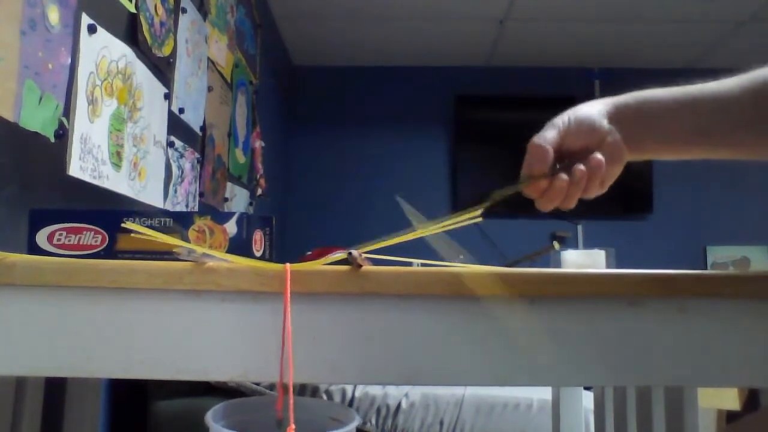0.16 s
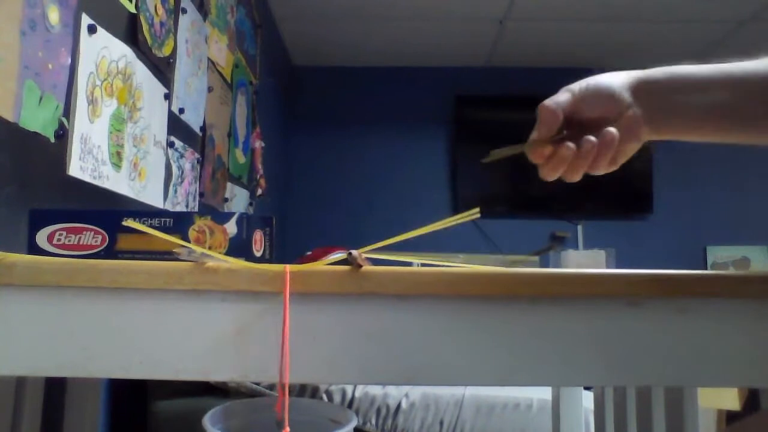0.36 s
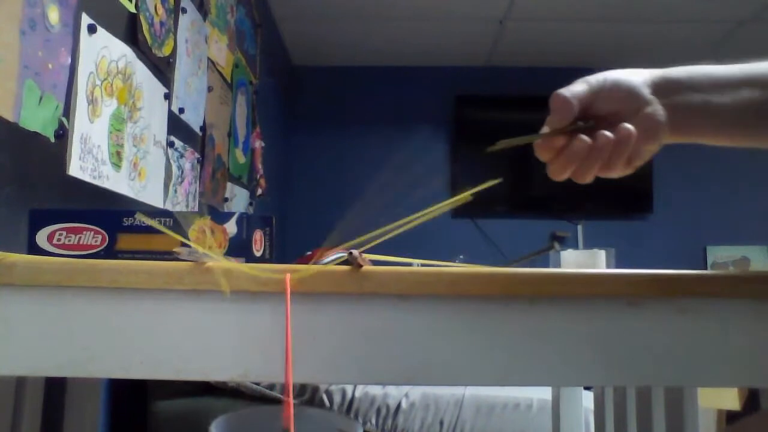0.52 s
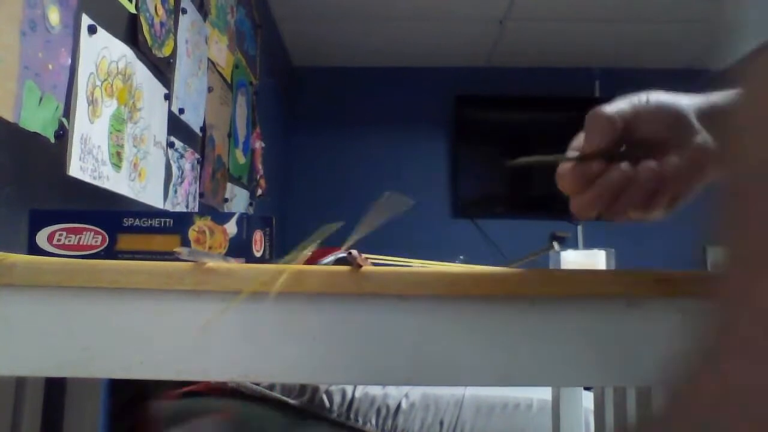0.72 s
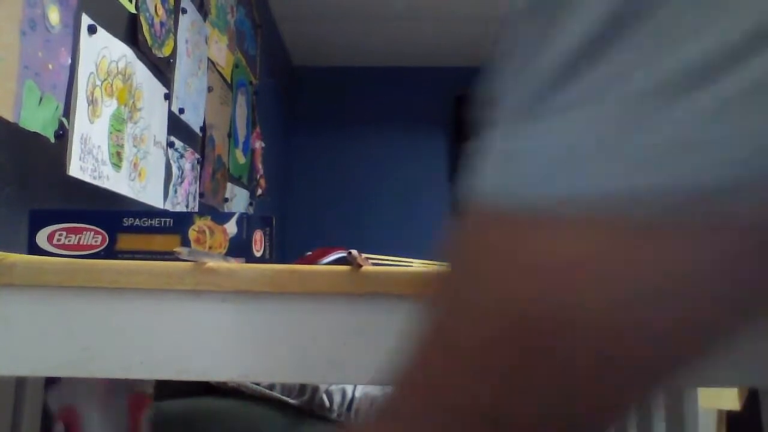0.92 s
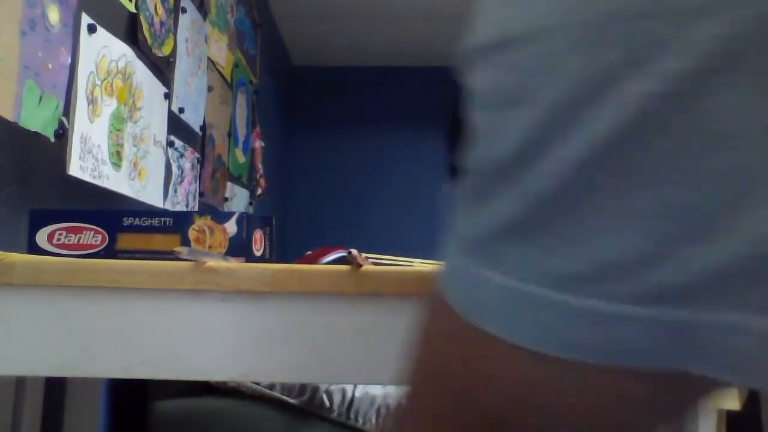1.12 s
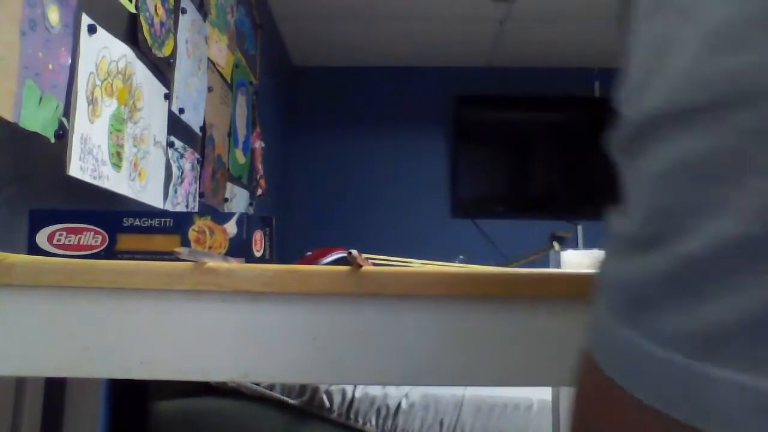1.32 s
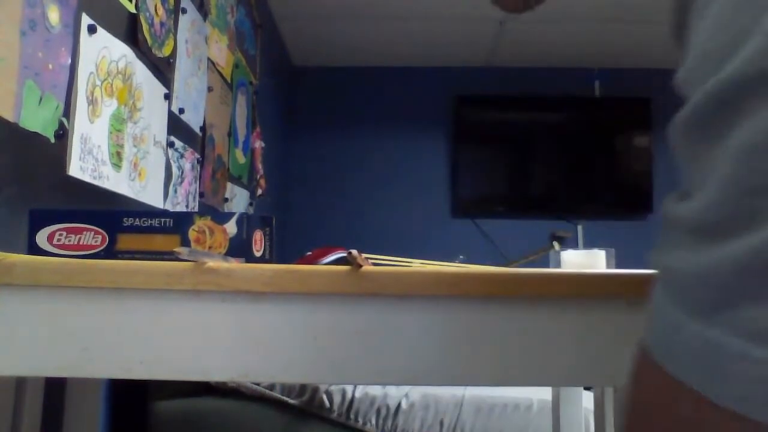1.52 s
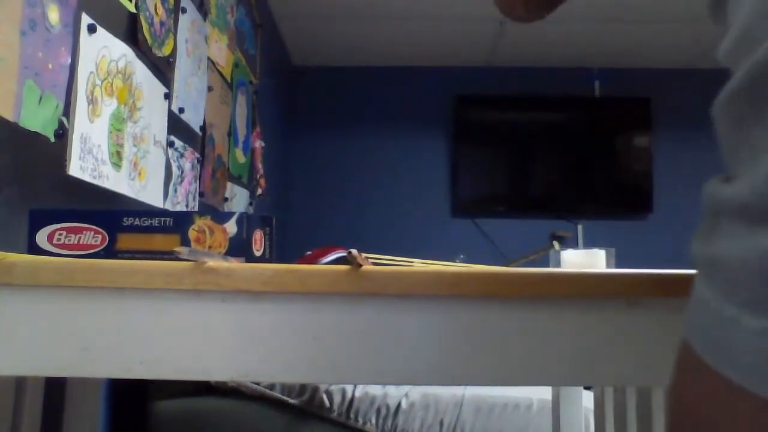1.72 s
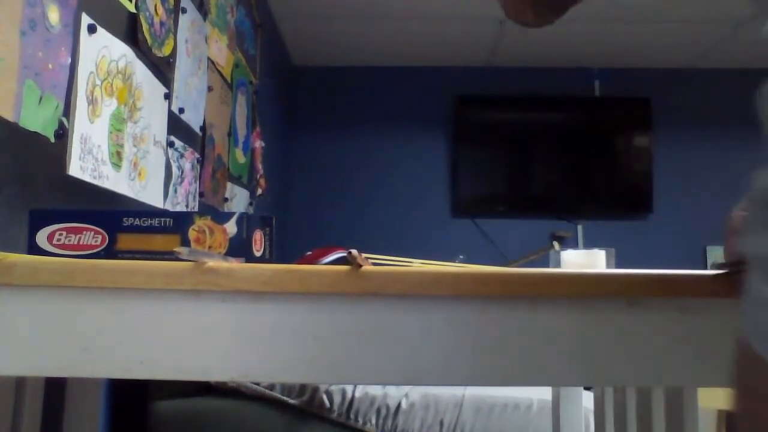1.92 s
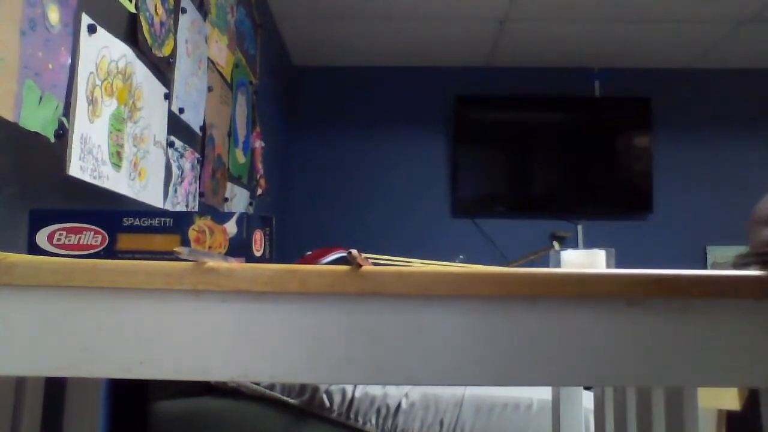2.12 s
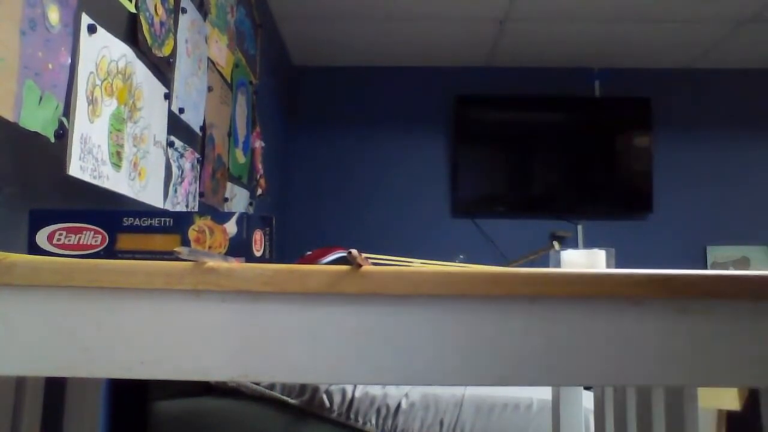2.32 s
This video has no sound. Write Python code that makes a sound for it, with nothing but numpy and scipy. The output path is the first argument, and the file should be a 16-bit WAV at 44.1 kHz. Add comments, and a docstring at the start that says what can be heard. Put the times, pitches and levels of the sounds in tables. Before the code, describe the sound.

Dry spaghetti ticks and snaps, a brief near-quiet gap follows, then a cup of nails slams down, bounces and spills with clatter and short metallic ringing, heard indoors from nearby with faint low rumble.

```python
"""Over a faint rumble come first ticks, then sharp cracks: a beam of dry pasta snaps under a hanging plastic cup
of steel nails. The cup then crashes on a hard floor; the nails spill, jostle and ring until all settles.
Cracks and knocks are shaped noise bursts with short pings and the tail of a small room; taps, cup and nails
are ringing modes; the jostling load is a dense train of clicks through resonators; thumps and rumble are
low noise."""
import sys
import numpy as np
from scipy import signal
from scipy.fft import rfft, irfft
from scipy.io import wavfile
from scipy.ndimage import uniform_filter1d, minimum_filter1d

SR = 44100
rng = np.random.default_rng(int(sys.argv[2]) if len(sys.argv) > 2 else 0)


def persist_wave(psi):
    """Save psi, clipped to +-1, as 16-bit WAV."""
    counts = np.round(np.clip(psi, -1, 1) * 32767).astype(np.int16)
    wavfile.write(sys.argv[1], SR, np.atleast_2d(counts).T)


N = 103723  # length [samples]

# Low rumble of the house: (time [s], level [dB])
HUM = [(0, -90), (.12, -61), (.38, -51), (1.3, -45.5), (1.5, -47), (2.2, -49.5), (2.35, -60)]
# Relative spectrum of the rumble: (frequency [Hz], density [dB per Hz])
HUM_COLOUR = [(24, -79), (40, -54), (103, 2.5), (141, 1), (190, 2.5), (318, -12), (380, -18.5), (700, -42),
              (910, -63), (1540, -120)]

# Cracks, ticks and knocks, relative levels: (time [s], ping [dB], thud [dB], low-mid [dB], high-mid [dB],
# treble [dB], ping pitch [Hz], build-up [s])
KNOCKS = [(0.042, -58.5, -86, -89.5, -100.5, -71, 6660, 0.003),
          (0.118, -39, -48, -49, -41.5, -49, 4240, 0.017), (0.143, -13.5, -33, -30, -25, -35, 503, 0.0013),
          (0.159, -20.5, -35.5, -43, -34, -33.5, 1810, 0.0024),
          (0.235, -33, -44, -27, -41.5, -70, 3960, 0.0024),
          (0.268, -35, -36, -34, -48, -56.5, 4070, 0.0013),
          (0.342, -23, -29.5, -28.5, -23, -27, 3530, 0.0013),
          (0.359, -9.5, -26.5, -23.5, -13, -27.5, 3595, 0.0016),
          (0.443, -31, -56, -35, -32.5, -52, 6470, 0.0023),
          (0.46, -18, -40.5, -23, -19, -31.5, 3560, 0.0013), (0.49, -20, -48, -43, -22, -31, 6540, 0.0021),
          (0.52, -31, -48, -35.5, -19, -29, 3600, 0.0025), (0.595, -21, -38, -37, -25, -30, 2550, 0.0012),
          (0.601, -11, -55, -57, -24, -38, 1465, 0.0017), (0.618, -8, -47, -33, -28, -29.5, 4580, 0.00049),
          (0.626, -16, -46, -28.5, -20.5, -27, 510, 0.0035),
          (0.659, -15, -26, -26.5, -20.5, -23.5, 2080, 0.0023),
          (0.694, -12.5, -33, -39, -26, -24, 5480, 0.0013), (0.705, -19, -78, -32, -37, -28, 9940, 0.003),
          (0.73, -20.5, -64, -56, -51, -39, 9900, 0.0025), (0.764, -26.5, -52, -61, -67, -42, 8090, 0.003),
          (0.781, -23.5, -65, -42, -33.5, -40.5, 4260, 0.0024),
          (0.855, -25, -51, -51, -45.5, -43, 5600, 0.0044), (0.885, -35, -60, -50, -49, -51, 5200, 0.0027),
          (0.893, -26.5, -55, -50, -35.5, -48, 4500, 0.002), (0.92, -34, -50, -48, -55, -45.5, 1480, 0.002),
          (0.932, -35, -42.5, -41, -41, -49, 500, 0.0036),
          (0.952, -23.5, -42.5, -43.5, -41, -45.5, 6000, 0.0025),
          (1.008, -21, -56, -51, -36, -33.5, 6860, 0.00044),
          (1.133, -23, -64, -53, -41.5, -38, 4340, 0.0076),
          (1.16, -21.5, -58, -56.5, -43.5, -38.5, 5250, 0.0017),
          (1.231, -38, -74, -57, -50.5, -55, 9500, 0.0017), (1.309, 1, -17.5, -13, -20, -27, 1365, 0.0045),
          (1.35, -3.5, -9.5, -24.5, -13, -22.5, 2582, 0.009), (1.389, -7, -12, -10, -19.5, -24, 427, 0.017),
          (1.41, -2, -8.5, -11, -17.5, -24, 1311, 0.008), (1.474, -20, -26, -36, -21.5, -31, 2360, 0.0062),
          (1.503, -9.5, -23.5, -25.5, -32, -37.5, 2445, 0.0024),
          (1.556, -14.5, -25, -31, -22, -32, 2554, 0.012), (1.575, -8, -18, -19.5, -19, -26.5, 2460, 0.003),
          (1.604, -6.5, -31.5, -15.5, -14, -23, 2380, 0.0036),
          (1.638, -19.5, -27, -23, -28, -32.5, 488, 0.0022),
          (1.674, -20.5, -34.5, -23.5, -26, -35.5, 2380, 0.0045),
          (1.698, -12, -34, -36.5, -24.5, -31.5, 4520, 0.0046),
          (1.752, -13, -44, -22.5, -24, -37.5, 1680, 0.0015),
          (1.831, -20.5, -33, -37.5, -26.5, -45.5, 3180, 0.00069),
          (1.896, -26, -45, -30, -27.5, -46.5, 2400, 0.0058),
          (1.94, -20.5, -45.5, -28.5, -31.5, -47.5, 1520, 0.0015),
          (1.96, -28, -41, -42, -63, -40, 2410, 0.0034), (1.98, -26.5, -46, -45, -64, -50, 6940, 0.003),
          (2.033, -31, -65, -43, -42, -75, 2043, 0.0055), (2.057, -37, -66, -49, -55, -57, 3460, 0.0017),
          (2.107, -37, -55.5, -67, -74, -46.5, 6870, 0.003)]
# Where the thud, low-mid, high-mid and treble levels apply: (frequency [Hz])
KNOCK_BANDS_HZ = [500, 1330, 3500, 8000]
# Decay of the blow itself: (frequency [Hz], t60 [s])
KNOCK_T60_S = [(300, 0.059), (1300, 0.097), (4000, 0.078), (10000, 0.055)]
# Decay of the room: (frequency [Hz], t60 [s])
ROOM_T60_S = [(300, 0.26), (1300, 0.28), (4000, 0.23), (10000, 0.25)]
# Decay of the pings: (frequency [Hz], t60 [s])
PING_T60_S = [(500, 0.084), (1500, 0.051), (5000, 0.034), (10000, 0.061)]
CRACK_DB, CRACK_T60_S = 0, 0.0078
ROOM_DB = -10
ROOM_FILL_S = 0.06  # the tail builds up: the power still missing falls to a thousandth in this time
PEAK_WIDTH_HZ, PEAK_SPREAD_DB = 65, 3.5  # crowded small resonances in the noise of the blows
PING_WANDER_S, PING_WANDER_HZ = 3e-5, 250  # timing jitter that smears a ping into a cluster

# Jostling of the load between the knocks, in two stretches: (time [s], cup boom [dB], clatter [dB], jingle [dB])
JOSTLE = [
    [(0.11, -83, -99, -81), (0.178, -50.5, -94, -81), (0.286, -43.5, -56, -88), (0.31, -53, -50.5, -62),
     (0.402, -50, -36.5, -39.5), (0.516, -39, -35.5, -33), (0.572, -53, -34.5, -33.5),
     (0.708, -55, -62, -50), (0.98, -55, -63, -53.5), (1.138, -58.5, -77, -60), (1.304, -71, -54.5, -57)],
    [(1.312, -35, -25.5, -22.5), (1.364, -44, -20, -26), (1.48, -19.5, -26, -28.5), (1.518, -29, -34, -35),
     (1.606, -19, -22, -31), (1.682, -30.5, -30.5, -29.5), (1.792, -34, -28, -41.5), (1.912, -43, -60, -67),
     (2.03, -49.5, -55.5, -75), (2.182, -63, -71, -73), (2.3, -69, -86.5, -85.5)],
]
# Modes of the cup wall, lowest first: (frequency [Hz], relative level in the boom [dB], t60 [s])
CUP = [(247.9, 14, 0.12), (341.6, 5.5, 0.17), (389.2, -2, 0.21), (491.7, -9, 0.14), (716, -7.5, 0.092),
       (726, 2.5, 0.13)]
# Relative spectrum of the clatter: (frequency [Hz], density [dB per Hz])
CLATTER = [(350, -42.5), (600, -3.5), (1010, -5), (1330, 1), (1680, -4), (2450, -2.5), (2980, -17.5),
           (4000, -7), (5200, -26.5), (8800, -120)]
# Relative spectrum of the jingle: (frequency [Hz], density [dB per Hz])
JINGLE = [(1760, -30), (3000, -20), (4260, 5.5), (5630, -2), (6850, -0.5), (10600, -15.5), (11800, -21.5),
          (15300, -46.5), (22000, -120)]
CONTACTS_PER_S, CONTACT_SPREAD_DB = 7000, 2.8
CLATTER_CYCLES, JINGLE_CYCLES = 33, 27  # cycles a resonator takes to die by 60 dB
HEAP_HZ, HEAP_T60_S = [2324, 2380, 2445, 2530], 0.18  # lowest bend of nails of slightly unequal length
HEAP_DB = -2  # against the mean of the clatter and jingle levels

# Dull thumps through table and floor: (time [s], relative level [dB])
THUMPS = [(0.155, -33.5), (0.361, -26.5), (0.467, -33), (0.667, -27.5), (0.699, -30), (1.049, -52),
          (1.311, -18.5), (1.378, -14), (1.579, -24), (1.789, -47), (2.119, -42)]
THUMP_LOW_HZ, THUMP_HIGH_HZ, THUMP_T60_S, THUMP_RISE_S = 71, 226, 0.31, 0.003

# Dull taps on the table top: (time [s], level [dB])
TAPS = [(.235, -26.5), (.268, -32), (.36, -27)]
# Modes of the table top: (frequency [Hz], level against the tap [dB], t60 [s])
WOOD = [(835, 2.5, 0.13), (1510, -3, .06), (1780, 2, .06), (2030, -12, 0.11)]

# Single nails left ringing: (time [s], frequency [Hz], level [dB], swell [s], t60 [s], faster decay from [s])
NAILS = [(.362, 6584, -24, 0.032, 0.47, 0.44), (.49, 6630, -23.5, 0.043, 0.4, 0.49),
         (1.041, 1384, -32, .03, 0.096, 1), (1.5, 6630, -33, 0.014, .3, 2), (1.51, 7100, -34, .01, 0.41, 2),
         (1.52, 6700, -31, 0.023, 0.37, 2.3), (1.64, 6640, -31, .04, 1.9, 1.77),
         (1.71, 7900, -35, .005, 0.66, 2.2), (1.71, 7860, -39, .005, 0.79, 2.17),
         (1.76, 6700, -51, .02, 0.65, 2.5), (1.78, 6910, -44.5, .02, 0.8, 2.32),
         (1.809, 6630, -37.5, .01, 0.5, 2.24), (1.9, 2397, -40, 0.0041, 0.3, 1.92),
         (1.97, 6770, -53.5, 0.018, 1.9, 2.153), (1.981, 7000, -54, .005, 1.14, 2.155),
         (2.101, 2487, -62.5, 0.017, 0.9, 2.17)]
NAIL_WAVER_DB, NAIL_WAVER_RAD, NAIL_WAVER_HZ = 4, 0.74, 38  # full waver, of the later nails
FULL_WAVER_FROM_S, EARLY_WAVER_SHARE = .75, .25  # the early nails ring more steadily
FASTER_T60_S = 0.35  # loss added to the nail's own from the given time on

# Blows on the cup wall: (time [s], then the levels of its four lowest modes [dB])
BLOWS = [(1.308, -12, -23, -24, -21), (1.331, -34, -16.5, -39, -11), (1.364, -27, -19, -25, -10),
         (1.388, -14.5, -16, -28, -15), (1.412, -7, -28, -28, -19.5), (1.48, -21, -29, -35, -21),
         (1.566, -13, -32, -12.5, -24), (1.599, -16.5, -41.5, -16.5, -21.5),
         (1.688, -34.5, -42, -34.5, -26.5), (1.752, -23.5, -34, -22.5, -53), (1.91, -37, -34.5, -41, -61),
         (1.941, -44, -31, -49, -65), (2.001, -36, -56, -43, -69)]
BLOW_S = 0.0064  # length of each push
CUP_WAVER_RAD, CUP_WAVER_HZ = 1.38, 13.8

LOW_CUT_HZ, CUTOFF_HZ = 97, 11450
LIMIT_DB, RELEASE_DB_PER_S, LIMIT_WINDOW_S = -6.3, 250, .002


def from_db(db):
    """Decibels to gain."""
    return 10 ** (np.asarray(db) / 20)


def rms_one(x):
    """Scale to rms 1."""
    return x / np.sqrt(np.mean(x ** 2) + 1e-20)


def in_time(rows):
    """Columns of a curve table at every sample."""
    s, *columns = np.transpose(rows)
    return [np.interp(np.arange(N) / SR, s, column) for column in columns]


def at_hz(points, hz):
    """Read a frequency table, with pitch on a log scale."""
    table = np.array(points)
    return np.interp(np.log(hz), np.log(table[:, 0]), table[:, 1])


def band_pass(x, order, low, high):
    """Keep the band between two frequencies."""
    return signal.sosfilt(signal.butter(order, [low, high], "band", fs=SR, output="sos"), x)


def drift(corner_hz):
    """Slow random curve of rms 1: noise through a two-pole low-pass."""
    r = np.exp(-2 * np.pi * corner_hz / SR)
    noise = rng.standard_normal(N + SR)
    return rms_one(signal.lfilter([1], [1, -2 * r, r * r], noise)[SR:])  # the first second is run-in


def dying(clicks, t60):
    """Each click starts an exponential decay."""
    return signal.lfilter([1], [1, -from_db(-60 / (t60 * SR))], clicks + 1e-18)


def ring(clicks, hz, t60):
    """A unit click sets a decaying sine ringing, with a height of about 1."""
    r, w = from_db(-60 / (t60 * SR)), 2 * np.pi * hz / SR
    return signal.lfilter([0, np.sin(w)], [1, -2 * r * np.cos(w), r * r], clicks + 1e-18)


def pushes(s, gains, lengths):
    """A train of smooth bumps of given area."""
    out = np.zeros(N + SR)
    for start, gain, length in zip(s, gains, lengths):
        bump = np.hanning(int(np.clip(length, 0, .03) * SR) + 3)[1:-1]
        first = int(start * SR)
        out[first:first + len(bump)] += gain * bump / bump.sum()
    return out[:N]


def hum():
    """House rumble: noise coloured to the low range, over a very faint wide floor, following a level curve."""
    hz = np.maximum(np.fft.rfftfreq(N, 1 / SR), 1)
    colour = from_db(at_hz([(10, -52)] + list(HUM_COLOUR) + [(2000, -60)], hz))
    noise = irfft(rfft(rng.standard_normal(N)) * colour, N)
    return from_db(in_time(HUM)[0]) * rms_one(noise)


def resonant_noise():
    """Noise with a crowd of narrow peaks and dips at random pitches."""
    spectrum = rfft(rng.standard_normal(N))
    width = max(int(PEAK_WIDTH_HZ * N / SR), 1)
    peaks = uniform_filter1d(uniform_filter1d(rng.standard_normal(len(spectrum)), width), width)
    return irfft(spectrum * from_db(PEAK_SPREAD_DB * rms_one(peaks)), N)


def changing_noise(s):
    """The noise colour changes at every blow, stepping round five random sets of resonances."""
    colours = np.array([resonant_noise() for _ in range(5)])
    blow = np.searchsorted(s * SR, np.arange(N))
    return colours[blow % len(colours), np.arange(N)]


def struck(s, hz, db, length, t60, wander):
    """A mode that builds up during a contact, then dies; the higher, the rougher."""
    height = dying(pushes([s], [from_db(db)], [length]), t60)
    return height * np.sin(2 * np.pi * hz * (np.arange(N) / SR - s + wander))


def knocks():
    """Each blow is a crack, a burst that dies band by band, a short ping, and the room's tail."""
    rows, out = np.array(KNOCKS), np.zeros(N)
    wander = PING_WANDER_S * drift(PING_WANDER_HZ)
    edges = 400 * 2 ** np.arange(0, 5.1, .5)  # half-octave bands
    noises = [changing_noise(rows[:, 0]), changing_noise(rows[:, 0])]  # neighbouring bands take different noise
    for k, (low, high) in enumerate(zip(edges, edges[1:])):
        hz = np.sqrt(low * high)
        level_db = np.array([np.interp(np.log(hz), np.log(KNOCK_BANDS_HZ), row[2:6]) for row in rows])
        power = pushes(rows[:, 0], from_db(2 * level_db), rows[:, 7])
        # halved t60: power falls twice as many dB as a gain
        crack = from_db(2 * CRACK_DB) * dying(power, CRACK_T60_S / 2)
        burst = dying(power, at_hz(KNOCK_T60_S, hz) / 2)
        tail = dying(power, at_hz(ROOM_T60_S, hz) / 2) - dying(power, ROOM_FILL_S)
        total = crack + burst + from_db(2 * ROOM_DB) * tail
        noise = rms_one(band_pass(noises[k % 2], 2, low, high))
        out += np.sqrt(np.maximum(total, 0) / 2) * noise
    for s, ping_db, *_, hz, build_up in rows:
        out += struck(s, hz, ping_db, build_up, at_hz(PING_T60_S, hz), wander) / 2
    return out


def contacts():
    """A dense random train of uneven clicks of either sign."""
    sizes = from_db(CONTACT_SPREAD_DB * np.minimum(rng.exponential(1, N), 5))
    signs = rng.choice([-1, 1], N)
    return sizes * signs * (rng.random(N) < CONTACTS_PER_S / SR)


def grains(spectrum, cycles, count):
    """Contacts dealt to many small resonators that follow a spectrum."""
    clicks, dealt = contacts(), rng.integers(0, count, N)
    pitches = np.geomspace(spectrum[0][0], spectrum[-1][0], count)
    weights = from_db(at_hz(spectrum, pitches)) * np.sqrt(pitches)  # wider bands at higher pitches
    out = np.zeros(N)
    for k, (hz, weight) in enumerate(zip(pitches, weights)):
        # the root of pitch makes up for the shorter ring
        out += weight * ring(clicks * (dealt == k), hz, cycles / hz) * np.sqrt(hz)
    return out


def jostle():
    """Nails tumbling: the cup wall booms, the loose heap clatters, jingles and rings at the nails' lowest bend."""
    curves = [(0.017, -120, -120, -120)] + list(JOSTLE[0]) + list(JOSTLE[1])
    boom_db, clatter_db, jingle_db = in_time(curves)
    boom = rms_one(sum(from_db(db) * ring(contacts(), hz, t60) for hz, db, t60 in CUP))
    heap = rms_one(sum(ring(contacts(), hz, HEAP_T60_S) for hz in HEAP_HZ))
    heap_gain = from_db(HEAP_DB + (clatter_db + jingle_db) / 2)
    cup_down = np.arange(N) > BLOWS[0][0] * SR  # the heap rings only after the first blow on the cup
    clatter = rms_one(grains(CLATTER, CLATTER_CYCLES, count=28))
    jingle = rms_one(grains(JINGLE, JINGLE_CYCLES, count=28))
    return (from_db(boom_db) * boom + heap_gain * heap * cup_down
            + from_db(clatter_db) * clatter + from_db(jingle_db) * jingle)


def thumps():
    """Table and floor thumps: low noise that swells quickly and dies."""
    s, db = np.transpose(THUMPS)
    noise = band_pass(rng.standard_normal(N), 3, THUMP_LOW_HZ, THUMP_HIGH_HZ)
    bumps = pushes(s, from_db(db), np.full(len(s), THUMP_RISE_S))
    return rms_one(noise) * dying(bumps, THUMP_T60_S) / 2


def wood():
    """Taps set the modes of the table top ringing."""
    s, db = np.transpose(TAPS)
    clicks = np.zeros(N)
    clicks[(s * SR).astype(int)] = from_db(db)
    return sum(from_db(level_db) * ring(clicks, hz, t60) for hz, level_db, t60 in WOOD)


def nails():
    """Free nails ring at one bending mode that swells, wavers as they turn, and dies faster from a given time."""
    t, out = np.arange(N) / SR, np.zeros(N)
    for s, hz, db, swell, t60, faster_from in NAILS:
        age = np.maximum(t - s, 0)
        waver = 1 if s > FULL_WAVER_FROM_S else EARLY_WAVER_SHARE
        own_loss = np.maximum(age - swell, 0) / t60
        added_loss = np.maximum(t - faster_from, 0) / FASTER_T60_S
        level_db = db - 60 * (own_loss + added_loss) + waver * NAIL_WAVER_DB * drift(NAIL_WAVER_HZ)
        rise = np.sin(np.pi / 2 * np.minimum(age / max(swell, .001), 1)) ** 2
        phase = 2 * np.pi * hz * age + waver * NAIL_WAVER_RAD * drift(NAIL_WAVER_HZ)
        out += rise * from_db(level_db) * np.sqrt(2) * np.sin(phase)
    return out


def cup():
    """Each blow feeds the wall's low modes, which bend as the cup rolls and boom on through the run of blows."""
    s, *levels = np.transpose(BLOWS)
    out = np.zeros(N)
    for (hz, _, t60), db in zip(CUP, levels):
        height = dying(pushes(s, from_db(db), np.full(len(s), BLOW_S)), t60)
        bend = CUP_WAVER_RAD * drift(CUP_WAVER_HZ)
        out += height * np.sin(2 * np.pi * hz * np.arange(N) / SR + bend)
    return out


def scene():
    """All sources, one microphone."""
    return (hum() + knocks() + jostle() + thumps() + wood() + nails() + cup())[None]


def record(dry):
    """The deep bass is cut, a limiter holds the peaks down, the top is cut."""
    x = signal.sosfilt(signal.butter(4, LOW_CUT_HZ, "high", fs=SR, output="sos"), dry)
    slope = RELEASE_DB_PER_S * np.arange(N) / SR
    level_db = 20 * np.log10(np.abs(x) + 1e-9)
    held_db = np.maximum.accumulate(level_db + slope, axis=1) - slope  # jumps up, falls at the release rate
    over_db = np.maximum(held_db - LIMIT_DB, 0)
    span = int(LIMIT_WINDOW_S * SR)
    gain_db = uniform_filter1d(minimum_filter1d(-over_db, span), span)  # the gain dips just ahead of a peak
    x = x * from_db(gain_db)
    return signal.sosfilt(signal.ellip(10, 1, 90, CUTOFF_HZ, fs=SR, output="sos"), x)


dry = scene()
out = record(dry)
persist_wave(out)
```